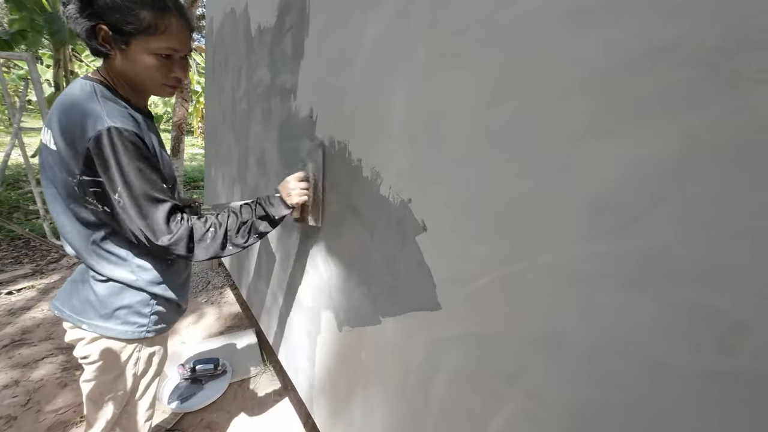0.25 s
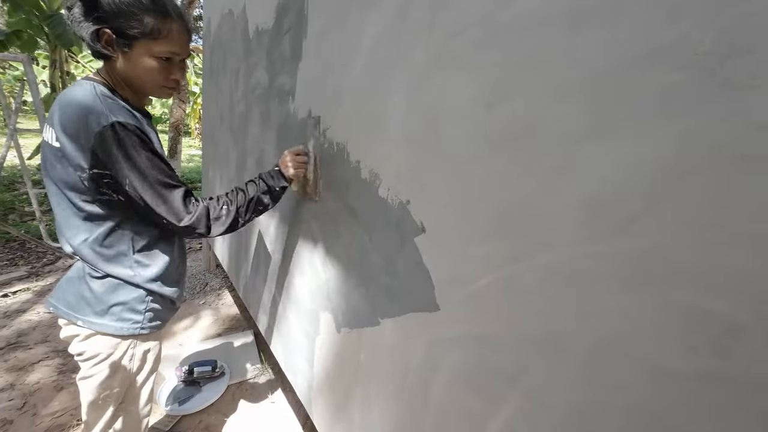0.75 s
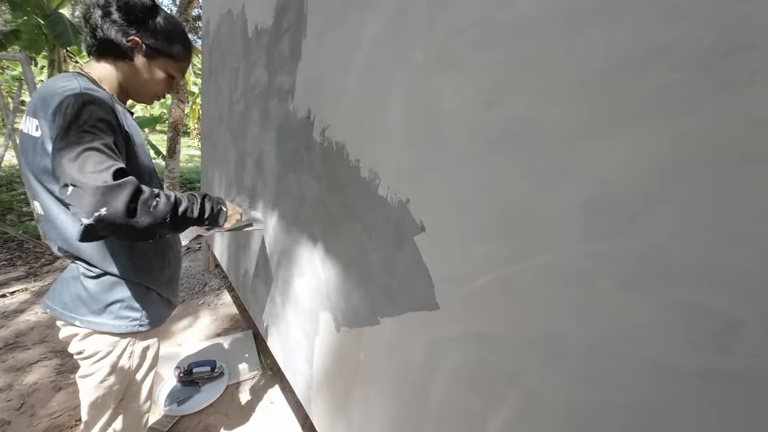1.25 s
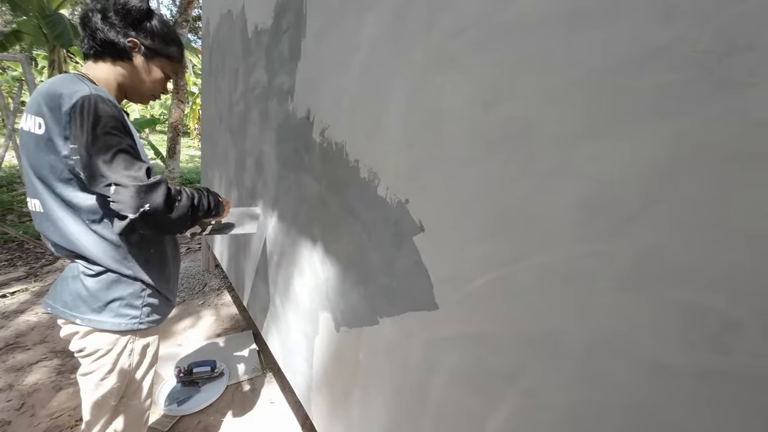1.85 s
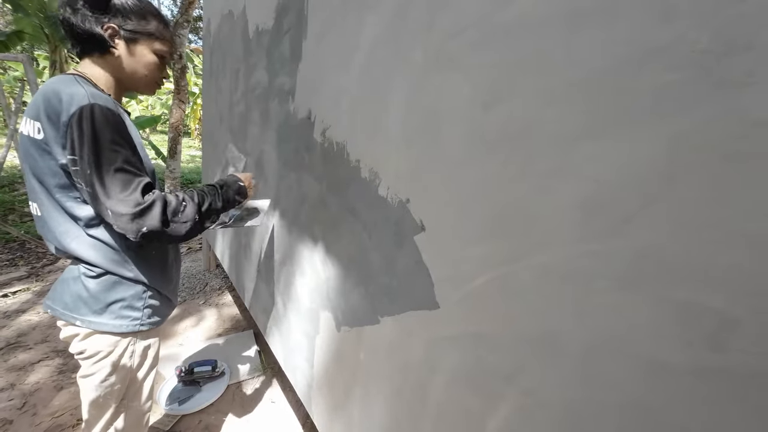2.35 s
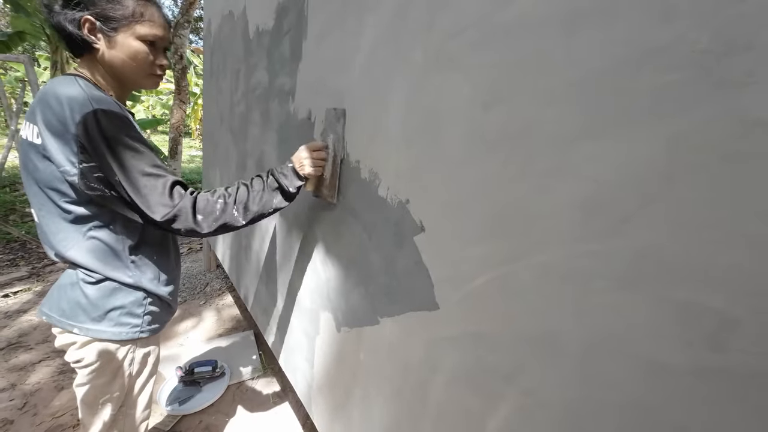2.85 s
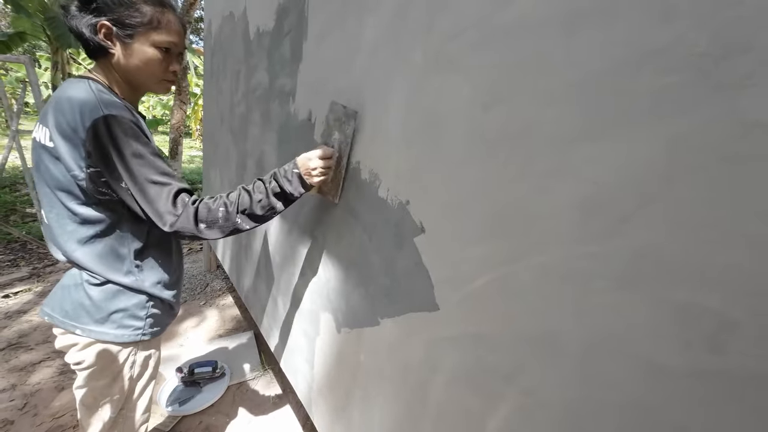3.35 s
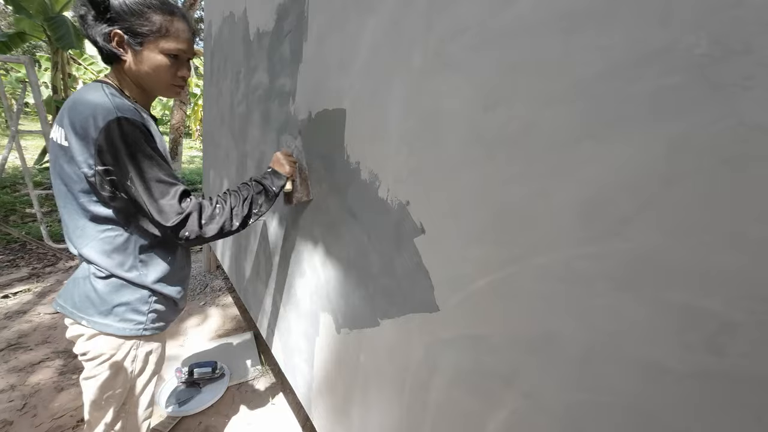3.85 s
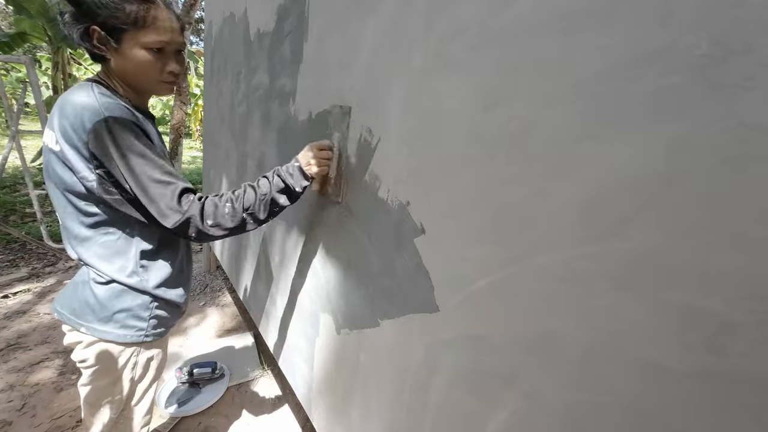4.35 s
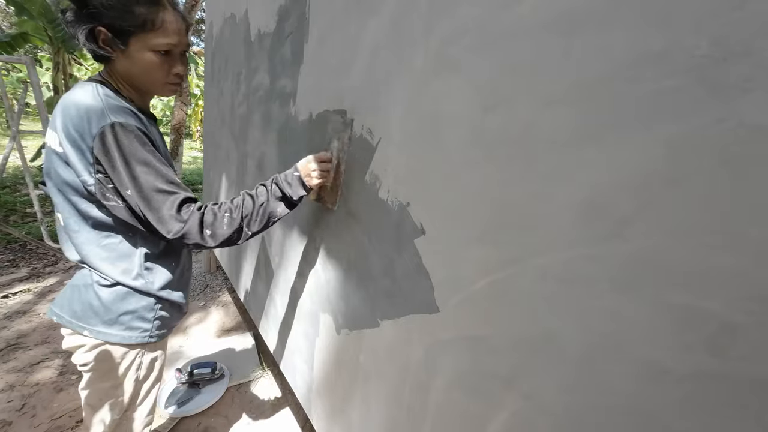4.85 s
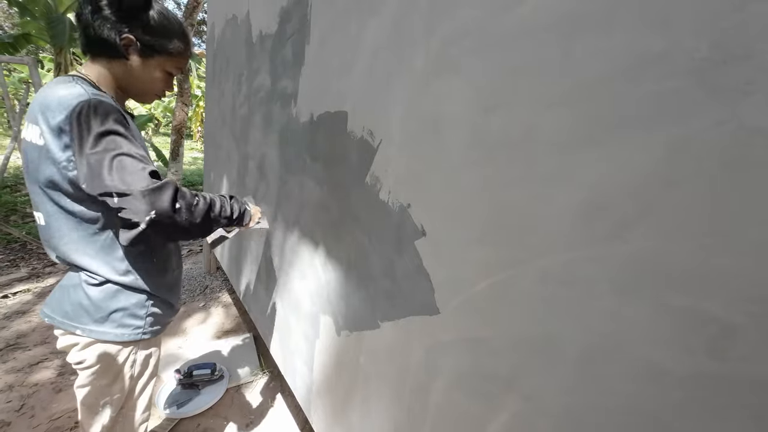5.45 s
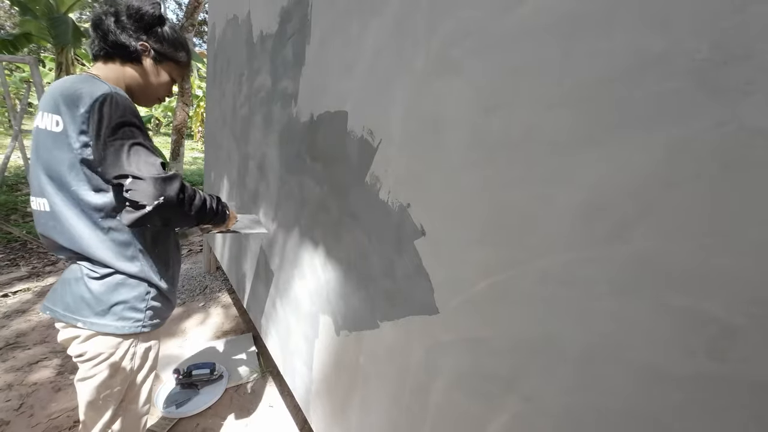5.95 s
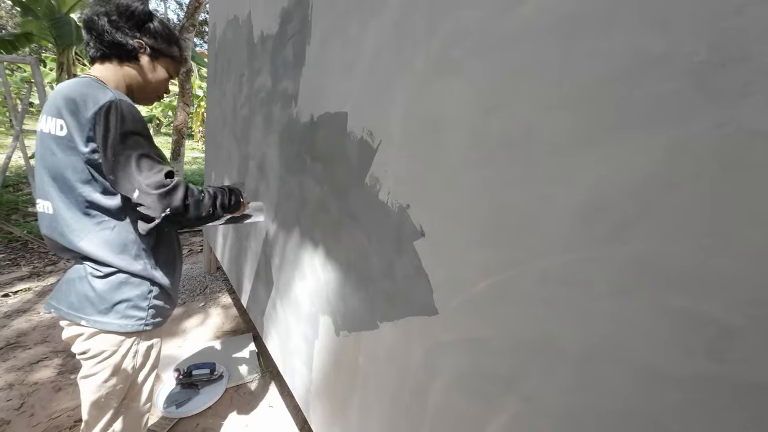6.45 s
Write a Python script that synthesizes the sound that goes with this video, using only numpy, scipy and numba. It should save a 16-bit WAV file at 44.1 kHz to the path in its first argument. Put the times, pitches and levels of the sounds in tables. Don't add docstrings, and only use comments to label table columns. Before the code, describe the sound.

Close outdoors, a steel trowel works gritty plaster on a board wall: quick rasping strokes at the start, softer scoops on a hand-held board, a quiet gap, then tiny wet ticks, hard scrapes and a bright slap. More soft scooping ends it. A far engine drones low throughout, with faint site murmur and light wind on a small stereo camera microphone a metre or two away.

```python
import sys
import numpy as np
from scipy import signal
from scipy.fft import rfft, irfft, next_fast_len
from scipy.io import wavfile
from scipy.ndimage import uniform_filter1d
from numba import njit

SR = 44100
rng = np.random.default_rng(int(sys.argv[2]) if len(sys.argv) > 2 else 0)


def transcribe(u):
    v = np.clip(np.atleast_2d(u).T, -1, 1)
    q = np.round(v * 32767).astype(np.int16)
    wavfile.write(sys.argv[1], SR, q)


def linear_from_db(decibels):
    return 10 ** (np.asarray(decibels, float) / 20)


N = 295029
T = np.arange(N) / SR

# from t/s, to t/s
HAWK_TIMES = [
    (1.2, 2.0),
    (5.4, 6.4),
]


def unit(x):
    return x / np.sqrt(np.mean(x ** 2))


def colour(x, table):
    hz, db = np.transpose(table)
    pad = 4096
    before = 2 * x[..., :1] - x[..., pad:0:-1]
    after = 2 * x[..., -1:] - x[..., -2:-pad - 2:-1]
    padded = np.concatenate([before, x, after], axis=-1)
    size = next_fast_len(N + 2 * pad)
    f = np.arange(size // 2 + 1) * SR / size + 1
    gain = linear_from_db(np.interp(np.log(f), np.log(hz), db))
    return irfft(rfft(padded, size) * gain, size)[..., pad:pad + N]


def band(x, lo_hz, hi_hz):
    return signal.sosfilt(signal.butter(3, [lo_hz, hi_hz], "band", fs=SR, output="sos"), x)


def walk(rate):
    k = int(SR / rate)
    held = np.repeat(rng.standard_normal(N // k + 1), k)
    return 1.4 * uniform_filter1d(uniform_filter1d(held, k), k)[:N]


@njit
def svf(x, hz, width):
    y, b, l = np.empty(len(x)), 0., 0.
    for i in range(len(x)):
        g, k = np.tan(np.pi * hz[i] / SR), width / hz[i]
        v = (b + g * (x[i] - l)) / (1 + g * (g + k))
        b, l, y[i] = 2 * v - b, l + 2 * g * v, k * v
    return y


def grit(spread_db, judder_db):
    sizes = linear_from_db(np.minimum(spread_db * rng.exponential(size=N), 24))
    judder = linear_from_db(judder_db * walk(60) + .5 * judder_db * walk(200))
    return unit(rng.standard_normal(N) * sizes * judder)


def stroke(start, length, db, share, steep_db, rise_curve, fall_curve, tip_db):
    span = slice(max(int(start * SR), 0), int((start + 1.3 * length) * SR))
    u = (T[span] - start) / length
    rise_db = 18 * np.maximum(1 - u / share, 0) ** rise_curve
    fall_db = 23.5 * np.maximum((u - share) / (1 - share), 0) ** fall_curve
    push_db = db - rise_db - fall_db
    on_hawk = any(a < start < b for a, b in HAWK_TIMES)
    tilt_db = 1.17 * steep_db + 5 * on_hawk + 0 * u
    edge_db = steep_db + tip_db * u
    hiss_db = -7.5 + 1.2 * edge_db
    fine_db = -16.5 + 2.07 * edge_db - 7 * u
    bands_db = np.array([-3 - tilt_db / 2, -4 + tilt_db / 2, hiss_db, fine_db])
    return span, linear_from_db(2 * (push_db + bands_db))


def hand():
    # start t/s, length/s, peak level/dB, share of length before the peak, steepness/dB
    wall_sweeps = [(0.019, 0.041, -45, 0.39, -4.5), (0.055, 0.21, -37, 0.41, -0.5),
                   (0.614, 0.083, -42, 0.4, 1), (0.675, 0.15, -36, 0.34, -0.5), (0.772, 0.11, -49, 0.54, 7),
                   (.82, .1, -43, 0.56, 0), (2.918, .14, -55, 0.49, -3), (3.04, 0.084, -61.5, .4, 7.5),
                   (3.122, 0.12, -51.5, 0.51, 6), (3.635, 0.17, -51, 0.58, 2.5),
                   (3.775, 0.075, -55, .4, -1), (3.86, 0.11, -52.5, .55, 3),
                   (4.348, .095, -39.5, 0.44, 2.5), (4.385, 0.11, -38, 0.43, 0.5),
                   (4.733, 0.11, -39.5, 0.61, 3), (4.83, .1, -56, .5, 3), (4.89, 0.12, -48.5, 0.36, 2.5),
                   (4.97, 0.11, -59, .5, 5), (5.009, 0.12, -46, .5, -1.5), (5.075, 0.16, -49.5, 0.34, 1)]
    # start t/s, length/s, peak level/dB, share of length before the peak, steepness/dB
    hawk_sweeps = [
        (1.413, .14, -47.5, 0.48, -1),
        (1.442, .19, -48, 0.55, 4.5),
        (1.522, 0.32, -57, 0.28, 4),
        (5.594, 0.18, -43.5, 0.66, -2.5),
        (5.691, 0.14, -46, 0.59, -1.5),
        (5.8, 0.23, -57.5, 0.31, -2.5),
        (5.92, 0.24, -58.5, 0.47, 3.5),
    ]
    # start t/s, length/s, peak level/dB, steepness/dB
    catches = [
        (-.005, 0.026, -39, 4),
        (0.524, 0.084, -46.5, 9),
        (3.512, 0.14, -35, 3.5),
        (3.848, 0.04, -49.5, 4),
        (4.69, 0.022, -46, 7.5),
        (4.875, 0.046, -53.5, -4),
        (5.581, .035, -57, 2),
    ]
    # start t/s, length/s, peak level/dB, steepness/dB
    slips = [
        (3.169, .055, -48, -5),
        (3.604, .032, -28, 0),
        (3.717, 0.063, -39, -1),
        (3.789, 0.042, -44, 3),
        (4.428, 0.038, -35, -7),
        (4.781, .048, -39.5, 8),
        (4.924, .055, -48, -13),
        (5.057, .04, -46, -7),
    ]
    rise, fall, slip = 2.17, 3.4, 1.23
    rows = [(*row, rise, fall, 0) for row in wall_sweeps + hawk_sweeps]
    for s, length, db, steep_db in catches:
        rows.append((s, length, db, .023, steep_db - 9, rise, fall, 13.5))
    for s, length, db, steep_db in slips:
        rows.append((s, length, db, .53, steep_db, slip, slip, 0))
    power = np.zeros((4, N))
    for row in rows:
        span, gain = stroke(*row)
        power[:, span] += gain
    return np.sqrt(np.abs(uniform_filter1d(power, size=100)))


def slow_level(x):
    return np.sqrt(uniform_filter1d(uniform_filter1d(x ** 2, size=1800), size=1800) + 1e-12)


def steady(x, lo_hz, hi_hz):
    y = band(x, lo_hz, hi_hz)
    return y / slow_level(y)


def patchy(x):
    hiss = 0
    for lo_hz, hi_hz in ((3000, 4500), (4500, 6600), (6600, 8200)):
        hiss = hiss + band(x, lo_hz, hi_hz) * linear_from_db(1.4 * walk(45))
    return hiss / slow_level(band(x, 3000, 8200))


def bending_blade(sand, modes, drift):
    out = 0
    for hz, width, db in modes:
        gain = linear_from_db(db + 4.2 * walk(22)) / np.sqrt(width)
        out = out + gain * svf(sand, hz * (1 + drift * walk(5)), float(width))
    return unit(out)


def scrape():
    # f/Hz, width/Hz, level/dB
    pressed_modes = [(870, 28, -2), (1154, 71, -3.5), (1255, 35, 3), (1546, 21, -30), (1625, 84, 4.5),
                     (1919, 74, 4), (2120, 37, -12), (2273, 53, 7.5), (2505, 14, 5), (3160, 200, -1),
                     (3440, 140, -20), (5650, 97, -38.5)]
    # f/Hz, width/Hz, level/dB
    free_modes = [(1140, 12, -0.5), (1378, 29, -8), (1477, 66, 2), (1660, 40, -1), (1915, 49, -8),
                  (2003, 13, -9.5), (2315, 65, -2.5), (2512, 22, -8.5), (2732, 22, -8), (3560, 19, -12.5),
                  (4930, 350, -12), (5850, 860, -21)]
    # f/Hz, level/dB per Hz
    edge_tone = [(500, -36), (850, -14.5), (1300, -10), (2200, -2), (2900, -11.5), (4300, -19.5),
                 (6200, -12.5), (8800, -26), (10600, -20.5), (12800, -26), (14600, -27.5)]
    low, upper, hiss, fine = hand()
    on_hawk = sum((T > a) & (T < b) for a, b in HAWK_TIMES)
    sand = grit(spread_db=2.5, judder_db=2.0)
    on_wall_ring = bending_blade(sand, pressed_modes, drift=.03)
    on_hawk_ring = bending_blade(sand, free_modes, drift=.012)
    edge = unit(colour(sand, edge_tone)) * linear_from_db(-4.0)
    steel = edge + np.where(on_hawk, linear_from_db(6.0) * on_hawk_ring, on_wall_ring)
    body = steady(steel, 726, 1500) * low + steady(steel, 1730, 3340) * upper
    return body + patchy(steel) * hiss + steady(steel, 8900, 15700) * fine


def booms():
    # start t/s, length/s, f/Hz, level/dB
    pushes = [(.0, .12, 358, -49), (.52, 0.08, 337, -55), (.55, 0.052, 2080, -48.5), (0.64, 0.18, 371, -52),
              (3.18, 0.057, 1400, -50), (3.517, 0.081, 380, -48.5), (3.519, 0.064, 310.5, -50),
              (4.364, 0.085, 453, -48), (4.366, 0.11, 376, -55), (4.373, .11, 100, -39),
              (4.38, .1, 55, -41), (5.45, .15, 400, -55), (5.52, 0.123, 329, -54), (5.614, 0.11, 2290, -49),
              (5.672, .04, 2040, -42), (5.699, 0.12, 2755, -56), (5.718, 0.073, 1399, -46),
              (5.743, .062, 1960, -42)]
    out, shake = 0, rng.standard_normal(N)
    for s, length, hz, db in pushes:
        push = np.sin(np.pi * np.clip((T - s) / length, 0, 1)) ** 0.36
        out = out + linear_from_db(db) * push * unit(svf(shake, hz + 0 * T, 22 + hz / 90))
    return out


def carry(order, under_db):
    # middle t/s, length/s, order in thirds of the firing tone, level/dB
    swells = [(.3, 0.22, 6, -51.5), (1.29, 0.79, 6, -49), (1.76, 0.11, 6, -44), (2.204, 0.71, 6, -47.5),
              (2.664, 0.36, 6, -41), (3.114, 0.82, 6, -40.5), (3.79, 0.85, 6, -35), (4.34, 0.61, 6, -33.5),
              (4.594, .45, 6, -36.5), (4.932, 0.41, 6, -39.5), (5.34, .3, 6, -45), (5.825, 0.59, 6, -41.5),
              (6.263, 0.63, 6, -38.5), (6.615, 0.48, 6, -38), (.9, 2.3, 4, -52), (1.543, .7, 4, -56),
              (4.2, 0.55, 4, -54.5), (5.4, 1.1, 4, -63), (2.05, 0.73, 7, -48.5), (3.603, 1.2, 7, -53),
              (4.45, 0.84, 7, -50), (5.7, 1.5, 7, -54.5), (2.25, 1.2, 8, -55.5), (3.3, 1.1, 8, -58),
              (5.1, 2.2, 8, -52.5), (6.003, 0.79, 8, -61), (2.762, 1.36, 10, -52.5), (4.902, .6, 10, -58),
              (6.303, 1.1, 10, -63)]
    power = linear_from_db(2 * under_db) + 0 * T
    for middle, length, thirds, db in swells:
        if round(thirds) == order:
            power += linear_from_db(2 * db) * np.cos(np.pi * np.clip((T - middle) / length, -.5, .5)) ** 2
    return np.sqrt(power)


def engine():
    # t/s, level/dB
    firing_level = [(0, -39.5), (.32, -35), (.48, -36.5), (.8, -34), (1.12, -36.5), (1.46, -30),
                    (1.9, -38.5), (2.1, -35), (2.54, -43), (2.65, -59), (2.78, -44), (3.36, -35),
                    (3.55, -39), (4.05, -40), (4.48, -32.5), (5.2, -49.5), (5.75, -43.5), (6.69, -41.5)]
    hz = 80.6 + 6.3 * np.exp(-T / 5.5) + 1.6 * np.exp(-T / .15)
    turn = 2 * np.pi * np.cumsum(hz) / SR
    firing_db = np.interp(T, *np.transpose(firing_level))
    out = linear_from_db(firing_db + .4 * walk(18)) * np.sin(turn)
    octave_gain = carry(order=6, under_db=-58) * linear_from_db(1.0 * walk(14))
    out += octave_gain * np.sin(2 * turn + .15 * walk(10))
    skirt = svf(svf(rng.standard_normal(N), 2 * hz, 26.), 2 * hz, 26.)
    out += linear_from_db(-53 - .8 * T + walk(3)) * unit(skirt)
    out += linear_from_db(-60 + 3.0 * walk(2)) * np.sin(5 * turn / 3)
    for order in (4, 7, 8, 10):
        gain = carry(order, under_db=-69.5) * linear_from_db(-1.5 + 0.85 * walk(3.6))
        out += gain * np.sin(order * turn / 3)
    return np.sqrt(2) * out


def site():
    # f/Hz, level/dB per Hz
    site_tone = [(25, -32.5), (110, -10.5), (220, -14.5), (394, -22), (650, -22.5), (911, -19),
                 (2000, -24.5), (3300, -33), (4370, -38.5), (5570, -35), (8500, -46), (11000, -44.5),
                 (12600, -73), (15000, -70)]
    # t/s, level/dB, low-mid level/dB
    murmur = [(0.0, -53.5, -44), (0.2, -61, -50), (5.65, -57, -41.5), (6.69, -59.5, -45)]
    s, mid_db, low_db = np.transpose(murmur)
    air = colour(rng.standard_normal(N), site_tone)
    air /= np.std(band(air, 475, 4700))
    out = 0
    for hz in 30 * 2 ** np.arange(0, 9.2, .5):
        level_db = np.interp(T, s, mid_db if hz > 650 else low_db - 8.5)
        flicker_db = 0.13 * walk(0.28) + 1.1 * walk(11)
        out = out + linear_from_db(level_db + flicker_db) * svf(air, hz + 0 * T, hz / 3)
    return out


def wind():
    # t/s, level/dB
    gusts = [
        (0.0, -46),
        (.7, -52),
        (2.6, -51.5),
        (4.1, -48),
        (5, -49.5),
        (6.3, -50),
        (6.69, -53),
    ]
    own = band(rng.standard_normal((2, N)), 16, 63)
    shared = 1.13 * band(rng.standard_normal(N), 13.6, 49.5)
    return unit(own + shared) * linear_from_db(np.interp(T, *np.transpose(gusts)) + 0.5)


def taps():
    # t/s, peak level/dB, brightness/dB, ring time to fall 60 dB/s
    landings = [
        (0.525, -25, -23, 0.082),
        (0.628, -34.5, -22, 0.057),
        (1.419, -36.5, -32, 0.078),
        (3.515, -33, -23, 0.023),
        (3.808, -40, -25, 0.043),
        (3.853, -37, -12.5, 0.036),
        (4.281, -19.5, -11, 0.039),
        (4.692, -39.5, -15, 0.086),
        (4.876, -38, -28, 0.047),
        (5.576, -37.5, -20, 0.057),
    ]
    # f/Hz, level/dB, ring time/s (not used here)
    knock_modes = [(1240, -6.5, 0.043), (1510, -2, 0.13), (1720, -10.5, 0.06), (1930, -7, 0.038),
                   (2054, -1, 0.036), (2630, -8.5, 0.059)]
    out, t = np.zeros(N + SR), np.arange(SR // 8) / SR
    chance = rng.standard_normal((len(landings), len(t)))
    detune = rng.standard_normal((len(landings), len(knock_modes)))
    for (s, db, bright_db, t60), contact, drift in zip(landings, chance, detune):
        fade = np.exp(-np.log(1000) * t / (t60 + 0.0055))
        ring = 0
        for (hz, mode_db, _), d in zip(knock_modes, drift):
            tone = np.sin(2 * np.pi * hz * (1 + 0.056 * d) * t)
            ring = ring + linear_from_db(mode_db) * tone * fade ** (hz / 500)
        thud = band(np.convolve(contact * fade ** 0.88, ring)[:len(t)], 830, 4600)
        crack = band(contact * fade ** 3.4, 2000, 7500)
        knock = thud / np.abs(thud).max() + linear_from_db(bright_db + 9.0) * crack / np.abs(crack).max()
        i = int(s * SR)
        out[i:i + len(t)] += linear_from_db(db) * knock
    return out[:N]


def ticks():
    # t/s, peak level/dB
    cracks = [
        (2.3039, -55),
        (2.9429, -53.5),
        (3.0018, -55),
        (3.0294, -56),
        (3.0621, -53),
        (3.1325, -62),
        (3.1445, -46),
        (5.505, -56),
    ]
    out = np.zeros(N)
    for s, db in cracks:
        out[int(s * SR)] = linear_from_db(db + 16.0)
    return band(out, 5000, 11880)


def scene():
    # f/Hz, side minus mid level/dB
    port_difference = [(60, -81), (200, -32.5), (700, -14), (1290, -23), (2380, -13), (4400, -7),
                       (8120, -0.5), (15000, -2.5)]
    work = scrape() + booms() + taps() + ticks()
    t = np.arange(SR // 8) / SR
    echo = unit(rng.standard_normal(len(t))) * np.exp(-np.log(1000) * t / 0.17) * (t > .004)
    mid = work + linear_from_db(-40) * signal.fftconvolve(work, echo)[:N] + engine() + site()
    scatter = rng.standard_normal(len(t)) * np.exp(-t / .012)
    scattered = signal.fftconvolve(mid, scatter / np.linalg.norm(scatter))[:N]
    side = colour(scattered, port_difference)
    side += linear_from_db(-11) * colour(mid, [(5500, -30), (7500, 0), (12000, 0), (15000, -6)])
    return np.array([mid + side, mid - side]) + wind()


def low_pass(x):
    return signal.sosfilt(signal.butter(12, 17090, fs=SR, output="sos"), x)


def record(dry):
    x = colour(dry, [(11300, 0), (12000, -9), (12900, -14), (13900, -4), (14600, 0)])
    x = signal.sosfilt(signal.ellip(8, .2, 70, 15800, fs=SR, output="sos"), x)
    x = x * np.minimum((N - np.arange(N)) / 180, 1)
    return low_pass(x)


dry = scene()
out = record(dry)
transcribe(out)
```